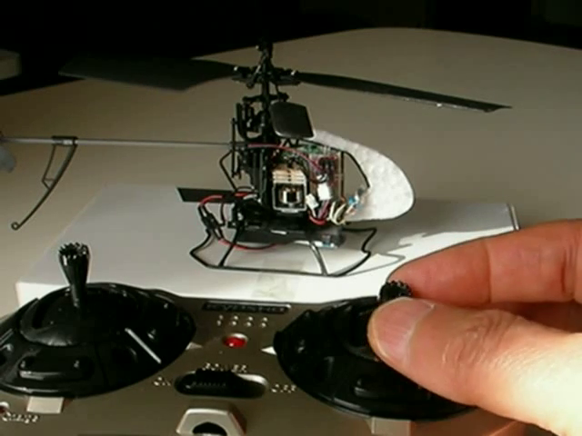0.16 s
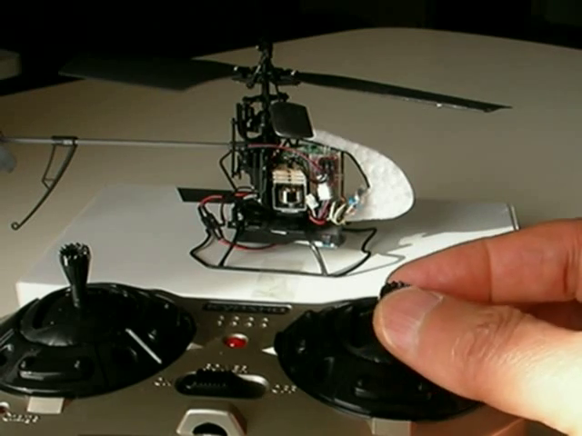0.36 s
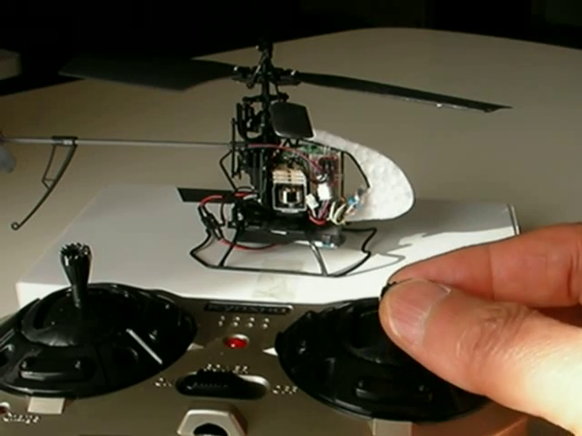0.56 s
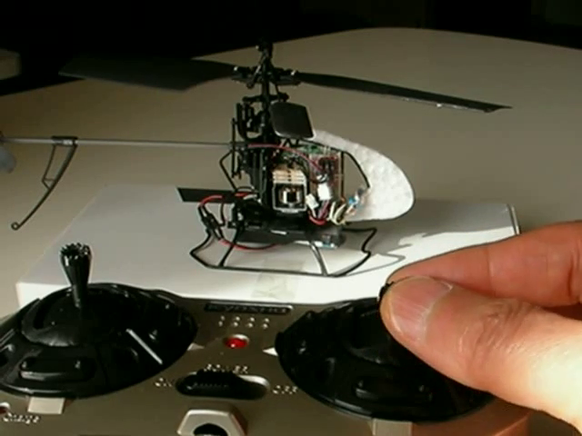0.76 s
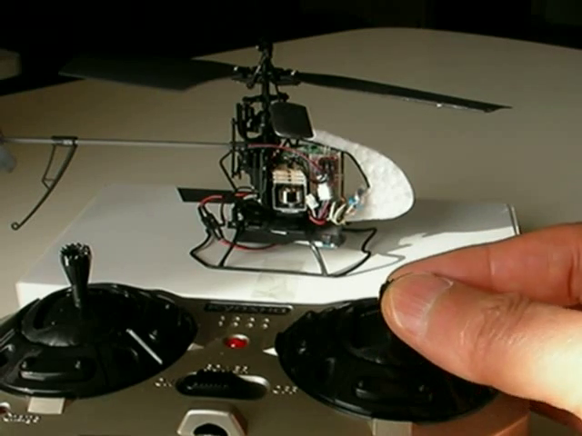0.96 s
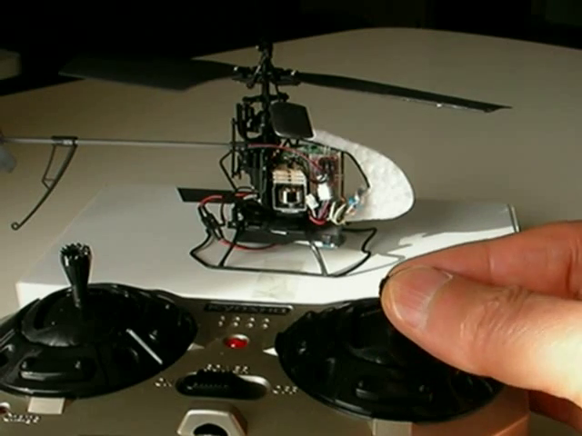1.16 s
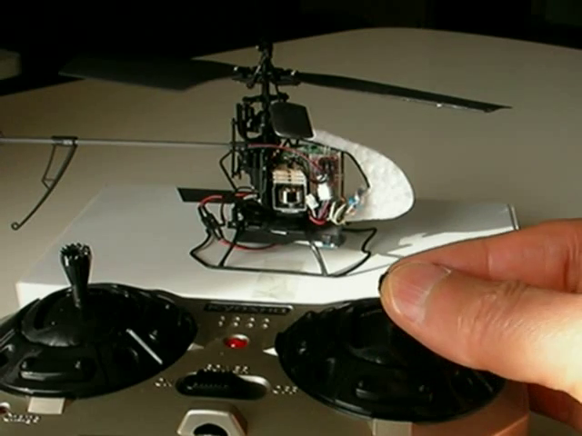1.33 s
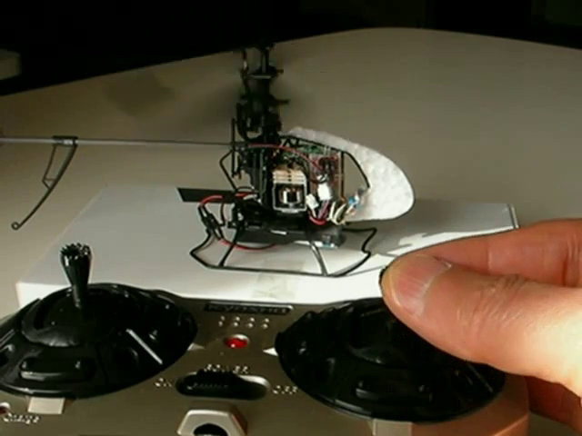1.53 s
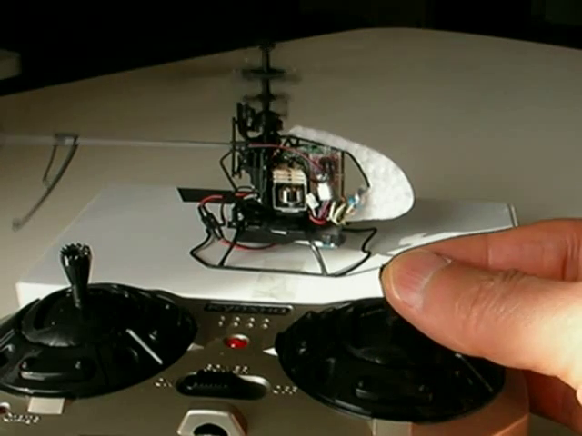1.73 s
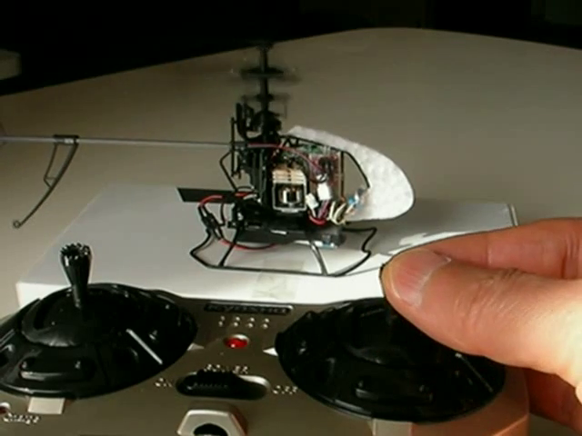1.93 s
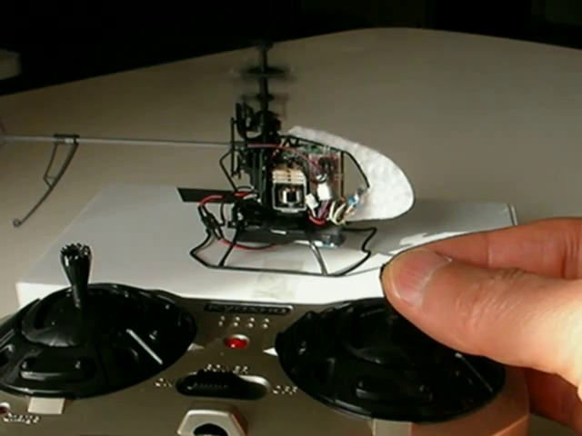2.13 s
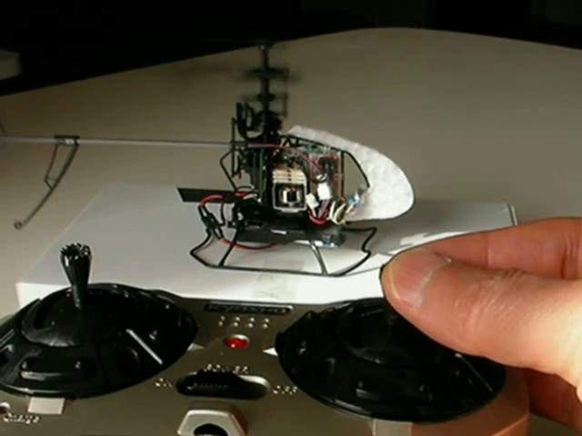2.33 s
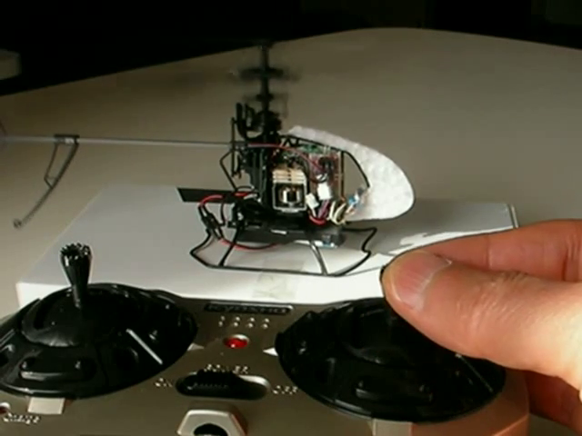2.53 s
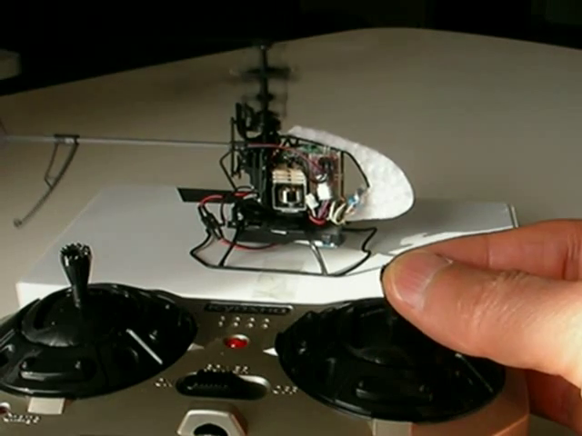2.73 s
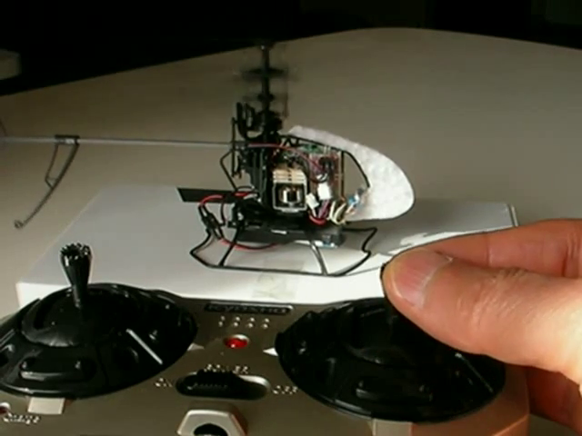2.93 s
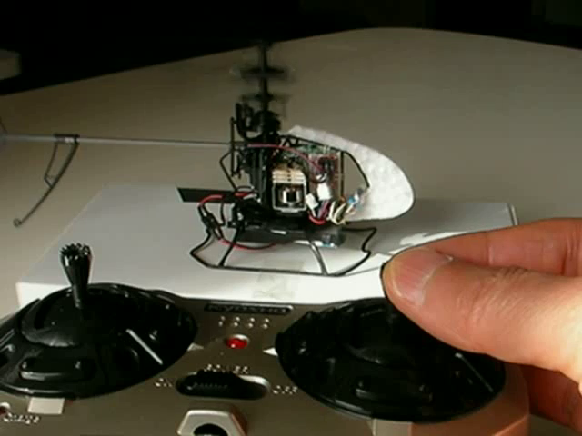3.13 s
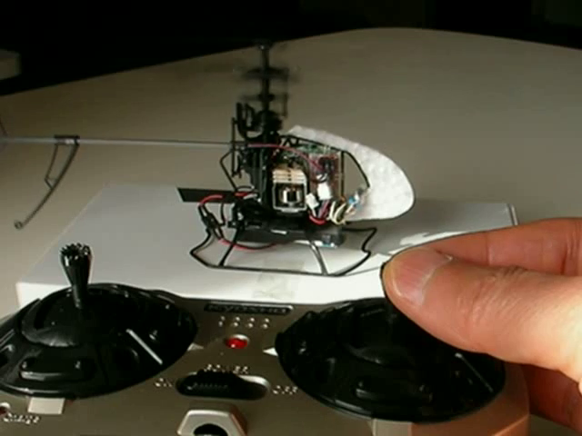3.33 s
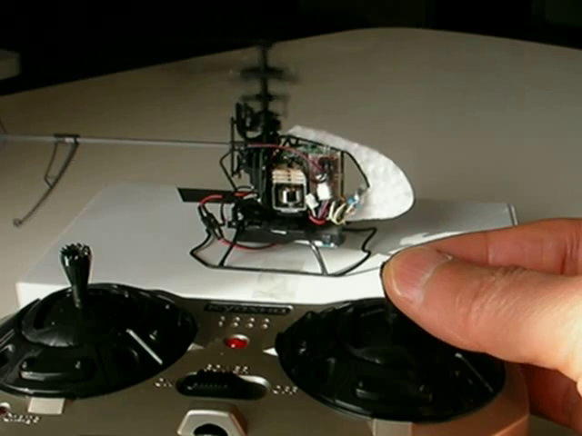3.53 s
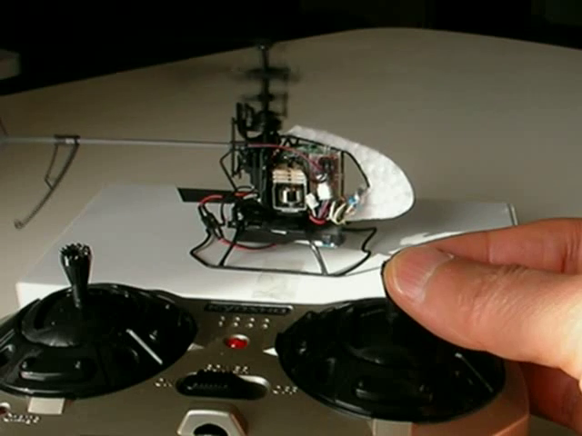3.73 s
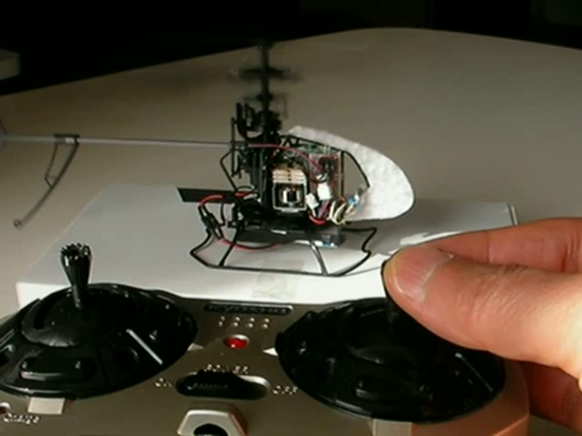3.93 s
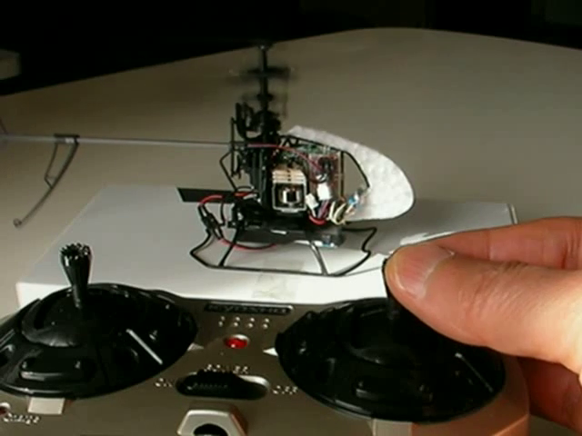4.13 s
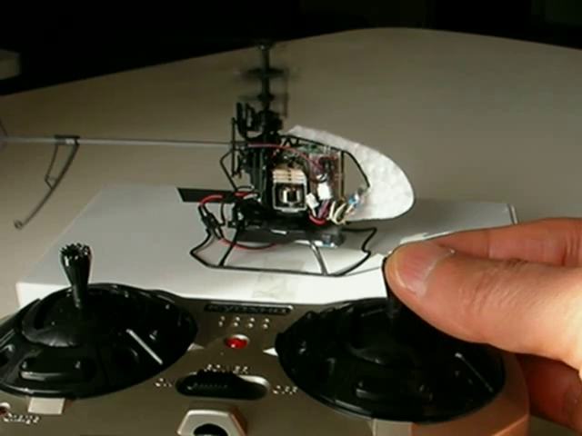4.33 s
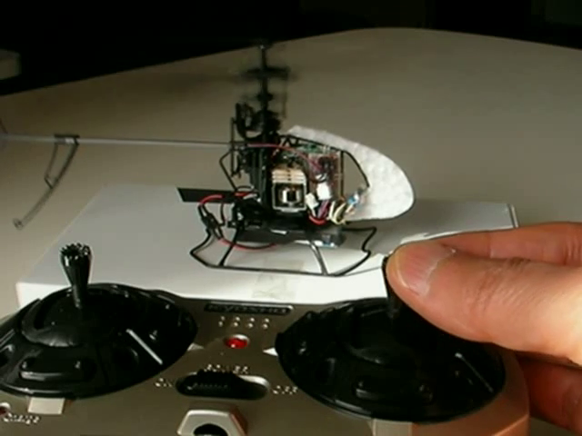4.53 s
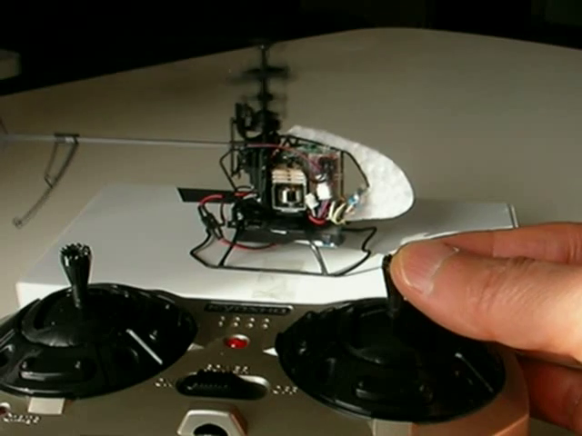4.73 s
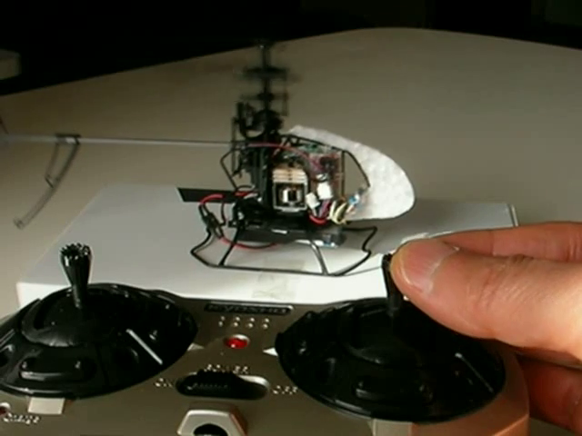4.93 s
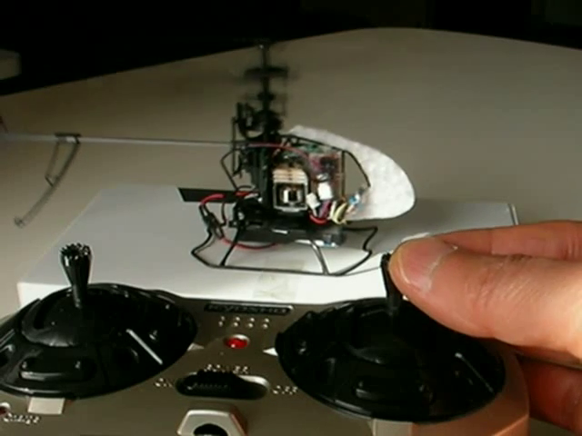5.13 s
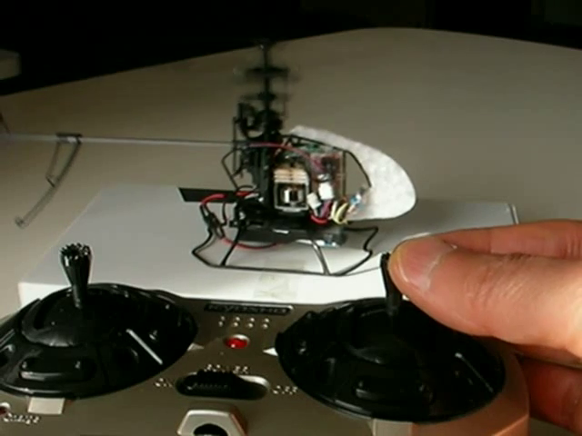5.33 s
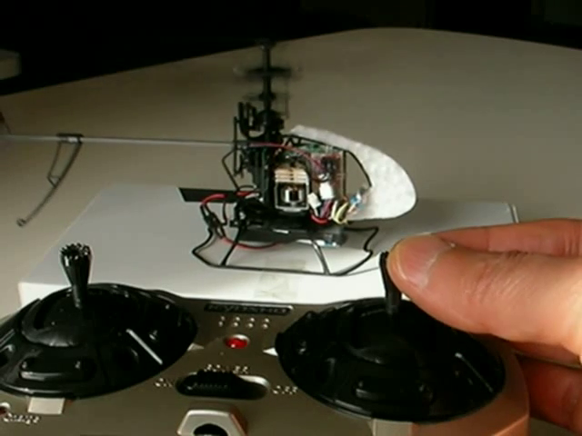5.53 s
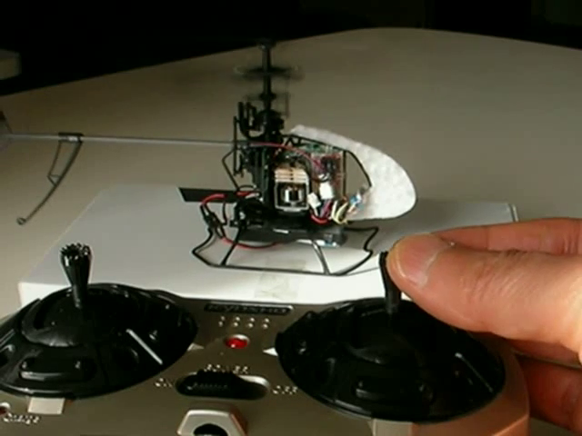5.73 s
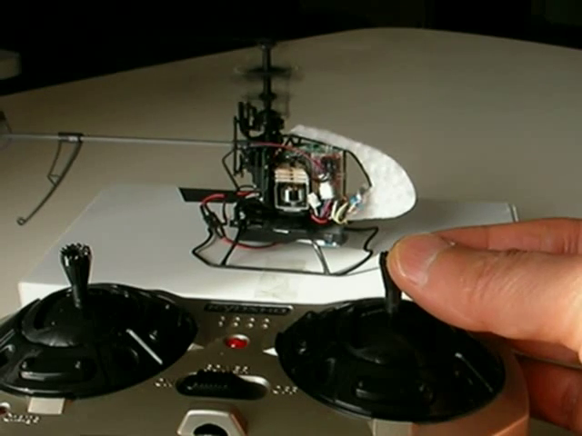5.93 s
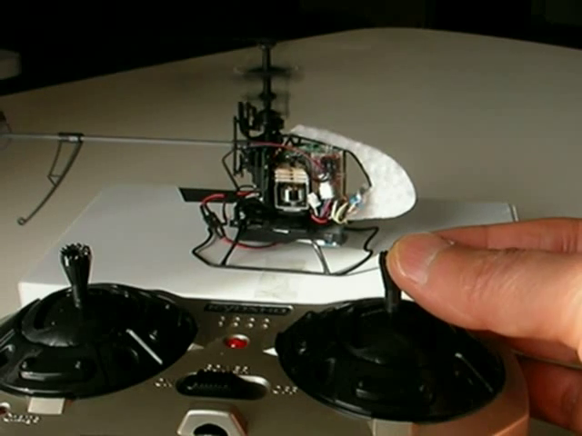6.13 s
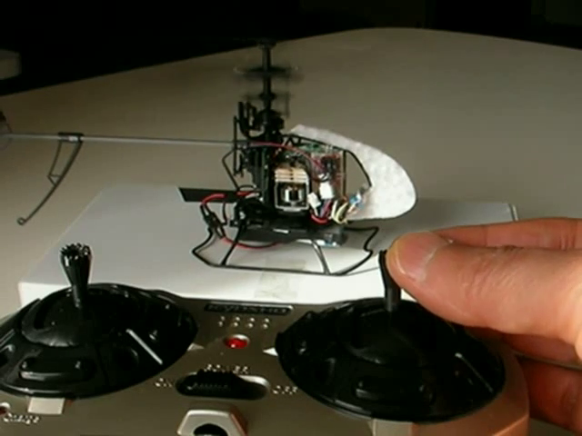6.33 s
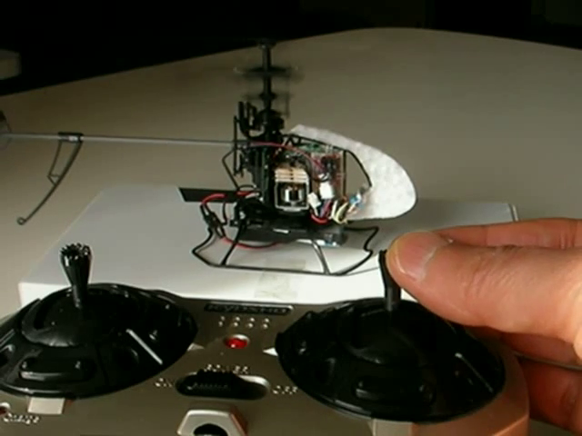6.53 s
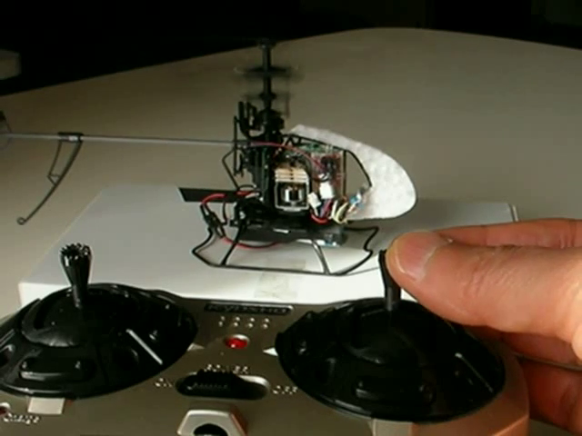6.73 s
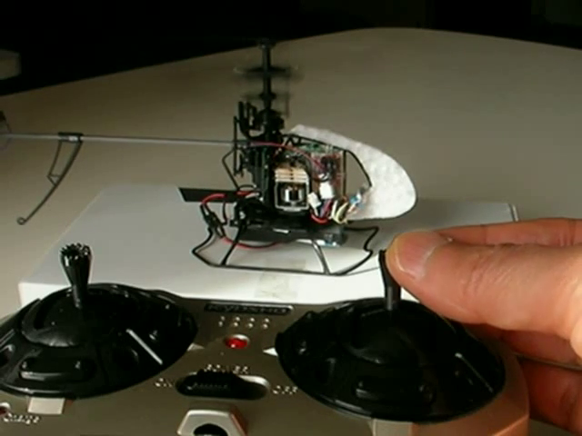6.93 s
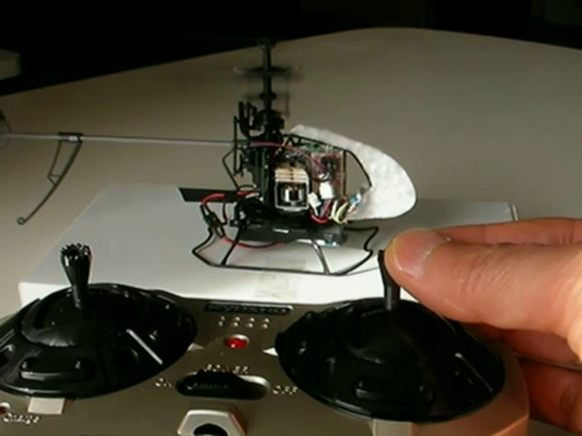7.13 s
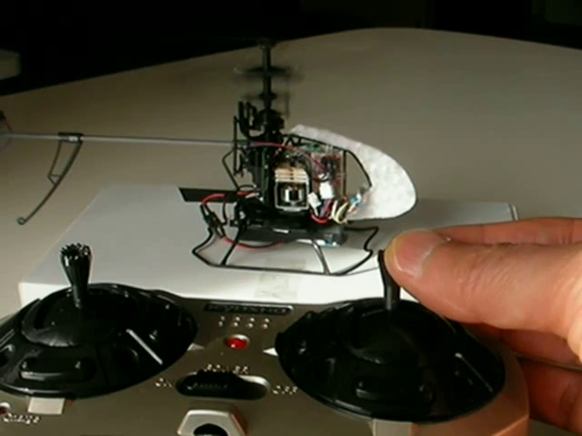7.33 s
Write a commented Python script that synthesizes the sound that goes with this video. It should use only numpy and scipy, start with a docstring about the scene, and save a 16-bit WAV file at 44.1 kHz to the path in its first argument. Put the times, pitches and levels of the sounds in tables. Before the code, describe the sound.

Close, wide stereo pickup of a small electric model helicopter on a bench, with short reflections from nearby surfaces. For the first 1.2 seconds there is only soft, low-heavy hiss and a faint thumb tick at 0.6. From about 1.26 a fuzzy servo whine creeps in, with tiny plastic knocks and short, piercing high whistles; a sharp cluster of clicks at 1.4 marks the motor catching. By 2 seconds the gears have swept up to a bright, rasping, fluttering whine with a steady thin whistle above and blade and tail motor hum below. It holds until about 4.2, with soft low wind thumps around 2.3 to 2.8. Then pitch and loudness climb in steps until about 6.4, the whistle disappearing near 5.2. A shrill, harsh gear scream holds to the end at about 7.4, with heavy low downwash buffets near 6.5 and 6.8.

```python
"""Model helicopter spinning up

A small electric helicopter starts on a bench, close to a mid-side microphone. Its speed controller whistles,
the motor stutters into motion, and a 10-tooth pinion drives a 70-tooth plastic gear: tooth-rate harmonics
scream and puffs of friction noise rasp as the throttle is raised. Blades and tail motor hum below as tones;
low noise is the downwash buffeting the microphone. Ticks, a servo whine, reflections and hiss complete it."""
import sys
import numpy as np
from scipy import signal
from scipy.fft import rfft, irfft, next_fast_len
from scipy.io import wavfile
from scipy.ndimage import uniform_filter1d, minimum_filter1d

SR = 44100
rng = np.random.default_rng(int(sys.argv[2]) if len(sys.argv) > 2 else 0)


def file_out(sig):
    """Save sig as 16-bit WAV at sys.argv[1]."""
    # one column per channel
    cols = np.atleast_2d(sig).T
    # limit, then scale
    lim = np.clip(cols, -1, 1)
    pcm = np.round(lim * 32767).astype(np.int16)
    wavfile.write(sys.argv[1], SR, pcm)


N = 325017
T = np.arange(N) / SR  # s

# Throttle stick. Each row: time in seconds, rotor speed asked for in turns per second.
THROTTLE_RPS = [(1.399, 0.0), (1.584, 19.37), (1.677, 25.24), (1.798, 28.62), (1.983, 31.69),
                (2.641, 32.01), (3.321, 32.12), (3.372, 32.49), (3.929, 31.81), (4.24, 32.05),
                (4.268, 33.16), (4.638, 35.21), (4.887, 38.23), (5.323, 40.27), (5.588, 43.27),
                (5.841, 45.24), (6.166, 45.94), (6.392, 48.12), (7.37, 48.0)]
# One tooth's blow. Each row: harmonic of the tooth rate, relative level in dB; the last row serves all above.
TOOTH_DB = [(1, 2.5), (2, 0.9), (3, 1.5), (4, 1), (5, -0.25), (6, 1.5), (7, -4.5)]
# Frame's radiation of the tooth tones. Each row: frequency in Hz, gain in dB.
FRAME_DB = [(500, -61), (1400, -31), (1900, -26.5), (2250, -18.5), (3050, -22.5), (3400, -17), (4000, -13),
            (5300, -11), (6800, -14), (8500, -18.5), (10200, -1), (12000, -2), (14300, -5.5),
            (17000, -10.5)]
# Frame resonances on top. Each row: centre in Hz, width in Hz, lift in dB.
FRAME_MODES = [(2141, 320, 4), (2341, 77, -11.5), (2753, 220, 9.5), (4000, 200, -1), (4580, 540, 6.5),
               (5730, 400, 5), (6260, 380, 3.5), (8380, 760, 17), (11500, 430, 4), (13500, 600, 3.5),
               (15470, 870, 13.5)]
# Rasp of the sliding teeth. Each row: frequency in Hz, relative density in dB per Hz.
RASP_DB = [(150, -28), (400, -23.5), (700, -34.5), (1250, -26.5), (1850, -25), (2200, -17.5), (2800, -12),
           (3800, -11), (5600, -8), (7100, -2.5), (8200, -4), (10000, -3), (12200, -0.5), (15700, -0.5)]
# Resonances and dips of the rasp. Each row: centre in Hz, width in Hz, lift in dB.
RASP_MODES = [(2320, 47, 4.0), (2550, 170, -2.0), (690, 62, -1), (336, 160, -12.5)]
# Kicks of current that jerk the motor into motion. Each row: start in seconds, level in dB, rise in seconds.
KICKS = [(1.324, -33.5, .004), (1.354, -36.5, 0.018), (1.384, -30, 0.015), (1.493, -37, 0.005)]
# Blade hum. Each row: multiple of the rotor speed, relative level in dB.
HUM_ORDERS_DB = [(1, -60), (2, -54), (3, -70), (4, -68), (5, -69.5), (6, -71), (9, -73.5), (11, -93),
                 (12, -70.5)]
# Skids shaken by the main motor's imbalance. Each row: shaft speed in Hz, mean level in dB.
SHAKE_DB = [(100, -80), (190, -68), (224, -66), (264, -55), (295, -58), (336, -68)]
# Skids chattering on the bench. Each row: frequency in Hz, relative density in dB per Hz.
CHATTER_COLOUR_DB = [(150, -20), (320, 2), (520, 1), (900, -16), (2000, -42), (8000, -80)]
# Tail motor. Each row: time in seconds, mean shaft speed in turns per second.
TAIL_RPS = [(1.4, 60), (1.8, 174), (2.1, 200), (2.8, 200), (4.0, 204), (4.5, 204), (4.92, 225), (5.32, 230),
            (5.63, 252), (5.91, 275), (6.6, 262)]
# Tail motor tones. Each row: multiple of its shaft speed, relative level in dB.
TAIL_ORDERS_DB = [(1, -12), (2, 1), (3, -3), (4, 1.5), (6, 0.5), (8, 0.5)]
# Tail boom's radiation of them. Each row: frequency in Hz, gain in dB.
BOOM_DB = [(200, -8), (270, -2.5), (400, -13), (520, -13), (620, -10), (780, -2), (1050, 0), (1230, 4.5),
           (1600, -1.5), (2100, 5)]
# Teeth knocking as the motor catches. Each row: start in seconds, level in dB before colouring.
KNOCKS = [(1.26, -39), (1.3237, -40), (1.3984, -23), (1.4102, -17.5), (1.419, -23), (1.4265, -23),
          (1.434, -24)]
# Colour of a plastic knock. Each row: frequency in Hz, gain in dB.
KNOCK_COLOUR_DB = [(300, -60), (1000, -33), (1500, -14), (2100, -4), (3200, -6), (4400, -5), (6000, -4),
                   (7600, 2), (10000, 0), (13000, 8), (15700, -10)]
# Servo whine. Each row: frequency in Hz, relative density in dB per Hz; then time in seconds, level in dB.
SERVO_COLOUR_DB = [(2500, -33), (3900, -16), (4350, -5), (4800, -17), (7000, -20)]
SERVO_LEVEL_DB = [(1.2, -100), (1.26, -59), (1.31, -55), (1.37, -47), (1.52, -44), (1.7, -100)]
# Thumb tick. Each row: frequency in Hz, relative density in dB per Hz; then time in seconds, level in dB.
THUMB_COLOUR_DB = [(250, -25), (550, 3), (1100, -4), (2200, -6), (4000, -25)]
THUMB_LEVEL_DB = [(.585, -130), (.595, -57), (.625, -85), (.66, -130)]
# Gusts on the microphone. Each row: peak time in seconds, eddy level in dB, swell and decay time in seconds.
GUSTS = [(2.34, -19, 0.066), (2.52, -24, 0.036), (2.76, -24, 0.023), (3.118, -35, .06), (4.82, -36, .05),
         (5.82, -34, .03), (6.51, -7, 0.035), (6.8, -11, 0.02)]
# Slow eddies. Each row: frequency in Hz, relative density in dB per Hz.
EDDY_COLOUR_DB = [(4, -17), (15, 13), (38, 14), (76, -12), (110, -26), (240, -27.5), (370, -44),
                  (700, -55), (1500, -100)]
# Buffeting by hard gusts. Each row: frequency in Hz, relative density in dB per Hz.
BUFFET_COLOUR_DB = [(30, -15), (100, 10), (220, -5), (400, -24), (1200, -60), (4000, -100)]
# Scatter off bench and walls, mid. Each row: frequency in Hz, gain in dB.
SCATTER_DB = [(300, -14), (2500, -3), (6000, 0.5)]
# Reflections across the microphone, side. Each row: frequency in Hz, gain in dB.
WIDTH_DB = [(100, 9), (500, 0), (1400, -2.5), (2300, 5), (3000, 0), (4400, -1.5), (6800, 3), (9000, -15),
            (12000, -10.5), (15000, -96)]
# Background hiss, mid. Each row: frequency in Hz, relative density in dB per Hz.
HISS_COLOUR_DB = [(12, -38), (20, 3), (76, -10), (101, -20.5), (268, -18.5), (375, -27.5), (603, -24),
                  (866, -21.5), (6840, -15.5), (15800, -15.5)]
# Background hiss, side. Each row: frequency in Hz, relative density in dB per Hz.
SIDE_HISS_COLOUR_DB = [(12, -33), (20, -2), (241, -10.5), (471, -17.5), (1110, -22), (4110, -27.5),
                       (4580, -28), (8700, -30.5), (12000, -48), (15600, -69), (22000, -120)]

GEAR_TEETH, PINION_TEETH = 70, 10
MOTOR_RATIO = GEAR_TEETH / PINION_TEETH
INERTIA_S = .07  # rotor's lag behind the stick
PULL_SCALE_RPS_PER_S = 34  # acceleration at which pull() reaches 0.76
GEAR_DB, GEAR_DB_PER_DOUBLING, TONES_DB = -13, 7.5, -2.09
RASP_PULL_DB, TONES_PULL_DB = 1.2, 0.1  # under strain the teeth slide harder
JUDDER_S, JUDDER_WIDTH_S, JUDDER_DB = 1.422, .022, -37
KICK_HOLD_S, KICK_RELEASE_S = 0.0079, 0.013
WHISTLE_HZ, WHISTLE_DB, WHISTLE_PULL_DB = 7990, -28.5, 3
WHISTLE_ON_S, WHISTLE_RISE_S = 1.4, 0.036
UNCHOPPED_RPS, UNCHOPPED_RANGE_RPS = 39.4, 1.2  # rotor speed where the current is no longer chopped
CHATTER_DB = -3  # against the shake
TAIL_DB, TAIL_DB_PER_DOUBLING, TAIL_PULL_DB = -57, 15, 10
TAIL_HUNT_LOW, TAIL_HUNT_FULL = .036, 0.01  # rms share of tail speed
DRAUGHT_DB, BUFFET_DB, BUFFET_POWER = -53, -12.5, 1.9
HISS_DB, SIDE_HISS_DB = -54.5, -50.5
EDGE_HZ = 15780


def amp(db):
    """Decibels to gain."""
    return 10 ** (np.asarray(db) / 20)


def unit(x):
    """Scales to rms 1."""
    return x / np.sqrt(np.mean(x ** 2) + 1e-20)


def noise():
    """White noise of rms 1."""
    return rng.standard_normal(N)


def curve(rows):
    """Rows of (s, value), joined by straight lines in time."""
    return np.interp(T, *np.transpose(rows))


def cycle(turns):
    """One cosine swing for each turn."""
    return np.cos(2 * np.pi * turns)


def colour(x, points, modes=()):
    """Filters by (Hz, dB) points with resonances (Hz, width Hz, dB) on top."""
    hz, db = np.transpose(points)
    size = next_fast_len(N + 8192)
    f = np.fft.rfftfreq(size, 1 / SR)
    gain_db = np.interp(np.log(f + 1), np.log(hz + 1), db)
    for centre, width, lift in modes:
        gain_db += lift / (1 + (2 * (f - centre) / width) ** 2)
    return irfft(rfft(x, size) * amp(gain_db), size)[:N]


def wander(hz):
    """Smooth random signal of rms 1, low-passed at about hz."""
    size = next_fast_len(N)
    f = np.fft.rfftfreq(size, 1 / SR)
    spectrum = rfft(rng.standard_normal(size)) / np.sqrt(1 + (f / hz) ** 4)
    return unit(irfft(spectrum, size)[:N])


def rotor_speed():
    """Turns per second: inertia makes the rotor lag behind the throttle."""
    keep = np.exp(-1 / (INERTIA_S * SR))
    return signal.lfilter([1 - keep], [1, -keep], curve(THROTTLE_RPS))


def pull(speed_rps):
    """How hard the motor pulls to speed the rotor up, 0-1."""
    acceleration = np.gradient(speed_rps) * SR
    return np.tanh(np.maximum(acceleration, 0) / PULL_SCALE_RPS_PER_S)


def doublings(speed_rps):
    """Octaves relative to top speed, 0 at the top."""
    return np.log2(speed_rps / speed_rps.max() + 1e-6)


def gears(speed_rps, turns):
    """Teeth strike and slide; both wheels run slightly out of true and rattle in their backlash."""
    throttle = speed_rps / speed_rps.max()
    spacing, height = tooth_flaws(turns), tooth_flaws(turns)
    mesh = gear_mesh(throttle, turns, spacing)
    force = gear_force(turns, height)
    tones = tooth_tones(speed_rps, throttle, turns, mesh)
    rasp = tooth_rasp(throttle, mesh) * amp(RASP_PULL_DB * pull(speed_rps))
    return gear_level(speed_rps) * force * (tones + rasp)


def tooth_flaws(turns):
    """Each tooth of the big wheel has its own flaw, which returns every turn."""
    flaws = unit(rng.standard_normal(GEAR_TEETH))
    return np.interp(turns * GEAR_TEETH, np.arange(GEAR_TEETH), flaws, period=GEAR_TEETH)


def gear_mesh(throttle, turns, spacing):
    """Tooth phase in cycles, displaced by runout, uneven spacing and backlash."""
    motor = turns * MOTOR_RATIO
    # load presses the teeth together; in between they rattle most
    rattle = np.interp(throttle, [.5, .66, .8, 1], [0.023, 0.057, 0.021, 0.024])
    runout = 0.067 * cycle(motor) + 0.012 * cycle(2 * motor)
    runout += 0.038 * cycle(turns) + 0.043 * cycle(2 * turns + 0.29)
    runout *= np.clip(throttle / 0.64, 0, 1) ** 0.82  # the shafts whip only at speed
    backlash = rattle * wander(hz=113) + 0.028 * wander(hz=23.0)
    return turns * GEAR_TEETH + runout + 0.011 * spacing + backlash


def gear_force(turns, height):
    """Contact force swings with both shafts and tooth height; plastic yields under the hardest blows."""
    motor = turns * MOTOR_RATIO
    swing = 1.2 * cycle(turns + 0.53) + 1.5 * cycle(motor + 0.088) + .5 * cycle(2 * motor)
    swing += 2.7 * height + 0.58 * wander(hz=181) + 0.19 * wander(hz=3.3)
    return unit(amp(3.6 * np.tanh(swing / 5)))


def tooth_tones(speed_rps, throttle, turns, mesh):
    """Blows sound at harmonics of the tooth rate, radiated by the frame."""
    # slow teeth strike softly, favouring the low harmonics
    softness = np.clip((.66 - throttle) / 0.22, 0, 1)
    # the warped wheel bites once a turn
    bite = cycle(turns + 0.22) + 0.25 * cycle(2 * (turns + 0.12))
    wobble_db = np.interp(throttle, [.66, 1], [2.4, 1.0]) * bite
    tones = np.zeros(N)
    for k in range(1, 15):
        audible = np.clip((19000 - k * GEAR_TEETH * speed_rps) / 1000, 0, 1)  # avoids aliasing
        # the turning blades shift the sound's paths, so each tone flutters in its own way
        flutter_db = wobble_db + 1.4 * wander(hz=85)
        harmonic_db = TOOTH_DB[min(k, len(TOOTH_DB)) - 1][1]
        blow_db = harmonic_db + softness * (5.5 - 7.4 * abs(np.log2(k / 1.98)))
        tones += audible * amp(blow_db + flutter_db) * cycle(k * mesh)
    radiated = colour(tones * np.clip(speed_rps / 10, 0, 1), FRAME_DB, FRAME_MODES)
    return radiated * amp(TONES_DB + TONES_PULL_DB * pull(speed_rps))


def tooth_rasp(throttle, mesh):
    """Sliding contact: a puff of friction noise on each tooth."""
    puffs = amp(2.7 * cycle(mesh)) * noise()
    level_db = -1.0 - 2.0 * np.clip((throttle - .66) * 3, 0, 1)
    return unit(colour(puffs, RASP_DB, RASP_MODES)) * amp(level_db)


def gear_level(speed_rps):
    """Gears grow louder with speed, plus one judder as the motor catches."""
    judder = amp(JUDDER_DB) * np.exp(-((T - JUDDER_S) / JUDDER_WIDTH_S) ** 2)
    return amp(GEAR_DB + GEAR_DB_PER_DOUBLING * doublings(speed_rps)) + judder


def controller(speed_rps, turns):
    """Chopped current makes the windings whistle, most raggedly at low speed."""
    commutation = turns * MOTOR_RATIO * 6
    ragged = 0.18 + 0.12 * np.exp(-speed_rps / 5)
    drift = .11 * wander(hz=12)
    tone = cycle(WHISTLE_HZ * T + drift + 0.19 * ragged * wander(hz=500))
    ripple = 1 + 0.035 * cycle(commutation) + ragged * wander(hz=300)
    return whistle_level(speed_rps) * np.sqrt(2) * tone * ripple


def whistle_level(speed_rps):
    """Kicks, then a steady drive, louder under load, that fades out towards full throttle."""
    kicks = np.zeros(N)
    for start_s, db, rise_s in KICKS:
        rise = np.clip((T - start_s) / rise_s, 0, 1)
        release_age_s = np.maximum(T - start_s - rise_s - KICK_HOLD_S, 0)
        kicks += amp(db) * rise * np.exp(-release_age_s / KICK_RELEASE_S)
    drive = 1 - np.exp(-np.maximum(T - WHISTLE_ON_S, 0) / WHISTLE_RISE_S)
    chopping = .5 - .5 * np.tanh((speed_rps - UNCHOPPED_RPS) / UNCHOPPED_RANGE_RPS)
    return kicks + drive * chopping * amp(WHISTLE_DB + WHISTLE_PULL_DB * pull(speed_rps))


def blade_hum(speed_rps, turns):
    """Two blades beat the air at multiples of the rotor speed, louder with speed."""
    blades = sum(amp(db) * cycle(round(k) * turns + rng.random()) for k, db in HUM_ORDERS_DB)
    level = (speed_rps / speed_rps.max()) ** 1.1 * amp(-1.5 + 1.5 * wander(hz=6))
    return np.sqrt(2) * blades * level


def skids(speed_rps, turns):
    """Motor imbalance sweeps through a skid resonance; the skids chatter with the shake."""
    shake = amp(np.interp(speed_rps * MOTOR_RATIO, *np.transpose(SHAKE_DB)) + wander(hz=14))
    chatter = amp(CHATTER_DB) * unit(colour(noise(), CHATTER_COLOUR_DB)) * shake / shake.max()
    return np.sqrt(2) * shake * (speed_rps > 0) * (cycle(turns * MOTOR_RATIO) + chatter)


def tail_motor(speed_rps):
    """Hunts around its own speed, steadies with throttle, and is louder holding the torque of speeding up."""
    rate_rps = curve(TAIL_RPS)
    hunt = np.interp(speed_rps / speed_rps.max(), [.66, .95], [TAIL_HUNT_LOW, TAIL_HUNT_FULL])
    turns = np.cumsum(rate_rps * (1 + hunt * wander(hz=41.3))) / SR
    lines = np.zeros(N)
    for k, db in TAIL_ORDERS_DB:
        lines += amp(db + 3.2 * wander(hz=22)) * cycle(round(k) * turns + rng.random())
    level = amp(TAIL_DB + TAIL_DB_PER_DOUBLING * doublings(rate_rps) + TAIL_PULL_DB * pull(speed_rps))
    onset = np.clip(speed_rps / 25, 0, 1) ** 2
    return np.sqrt(2) * colour(lines * level * onset, BOOM_DB)


def knocks():
    """Short plastic ticks while the motor jerks through the backlash."""
    strength = np.zeros(N)
    for start_s, db in KNOCKS:
        start = round(start_s * SR)
        age_s = T[start:][:SR // 20] - T[start]
        strength[start:][:len(age_s)] += amp(db) * np.exp(-age_s / .0015)
    return colour(strength * noise(), KNOCK_COLOUR_DB)


def servo():
    """Faint fuzzy whine, narrow-band noise, as the stick starts to move."""
    return unit(colour(noise(), SERVO_COLOUR_DB)) * amp(curve(SERVO_LEVEL_DB))


def thumb():
    """Soft tick of the thumb on the throttle stick, a short noise burst."""
    return unit(colour(noise(), THUMB_COLOUR_DB)) * amp(curve(THUMB_LEVEL_DB))


def downwash(speed_rps):
    """Eddies push the microphone's two sides against each other in lumpy thumps; hard gusts buffet it."""
    eddies = colour(noise(), EDDY_COLOUR_DB)
    # even out the level over 0.1 s, so the gusts set it
    eddies = unit(eddies / np.sqrt(uniform_filter1d(eddies ** 2, SR // 10) + 1e-12))
    gusts = sum(amp(db) * np.exp(-abs(T - peak_s) / swell_s) for peak_s, db, swell_s in GUSTS)
    buffet = amp(BUFFET_DB) * gusts ** BUFFET_POWER * unit(colour(noise(), BUFFET_COLOUR_DB))
    draught = amp(DRAUGHT_DB) * speed_rps / speed_rps.max()
    return (gusts + draught) * eddies + buffet


def reflections(x, t60_s):
    """Bench and walls: sparse taps of random sign that die away, energy 1."""
    t = np.arange(SR // 2) / SR
    present = (rng.random(len(t)) < 4000 / SR) * (t > .001)
    taps = rng.choice([-1., 1.], len(t)) * present * amp(-60 * t / t60_s)
    return signal.oaconvolve(x, taps / np.linalg.norm(taps))[:N]


def background(level_db, points):
    """Steady coloured hiss at a given rms level."""
    return amp(level_db) * unit(colour(noise(), points))


def scene():
    """Helicopter in the middle with some scatter; wider reflections and wind at the sides."""
    speed_rps = rotor_speed()
    turns = np.cumsum(speed_rps) / SR
    machine = gears(speed_rps, turns) + blade_hum(speed_rps, turns) + skids(speed_rps, turns)
    machine += tail_motor(speed_rps) + knocks() + servo() + thumb()
    whistle = controller(speed_rps, turns)
    mid = machine + whistle + amp(-8.5) * colour(reflections(machine, t60_s=0.067), SCATTER_DB)
    side = amp(-7.5) * colour(reflections(machine + amp(2) * whistle, t60_s=0.41), WIDTH_DB)
    side += downwash(speed_rps)
    mid += background(HISS_DB, HISS_COLOUR_DB)
    side += background(SIDE_HISS_DB, SIDE_HISS_COLOUR_DB)
    return np.array([mid + side, mid - side])


def record(dry):
    """A steep band edge before and after a fast limiter on the sharpest peaks."""
    edge = signal.firwin(1023, EDGE_HZ, window=("kaiser", 9), fs=SR)[None]
    sound = signal.oaconvolve(dry, edge, "same")
    peak = abs(sound).max(axis=0)
    gain = minimum_filter1d(.96 / np.maximum(peak, .96), size=61)
    limited = sound * uniform_filter1d(gain, size=41)
    return signal.oaconvolve(limited, edge, "same")


dry = scene()
out = record(dry)
file_out(out)
```